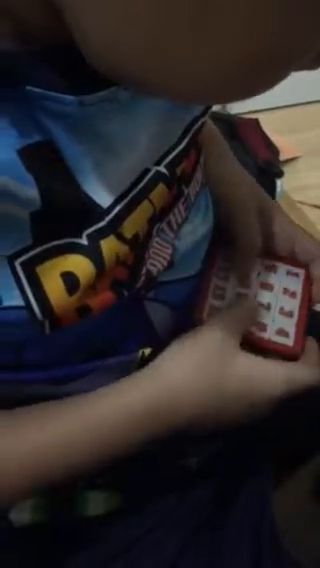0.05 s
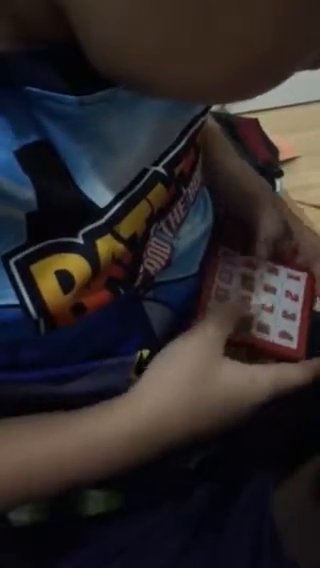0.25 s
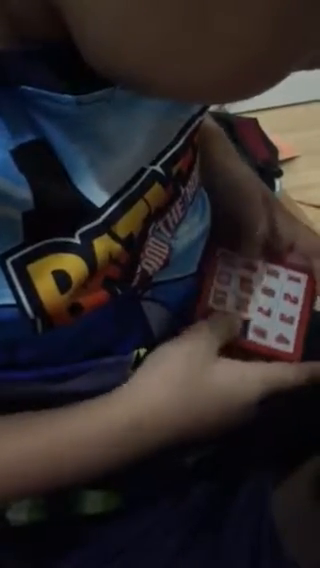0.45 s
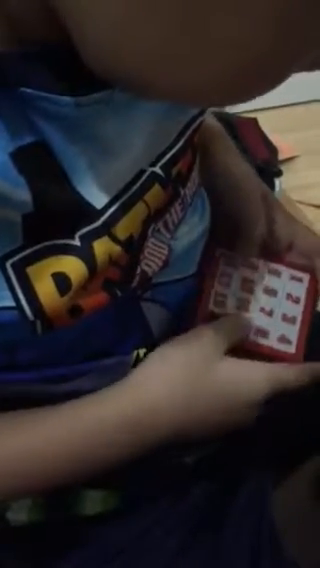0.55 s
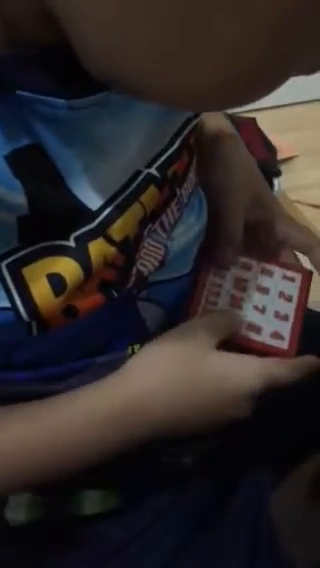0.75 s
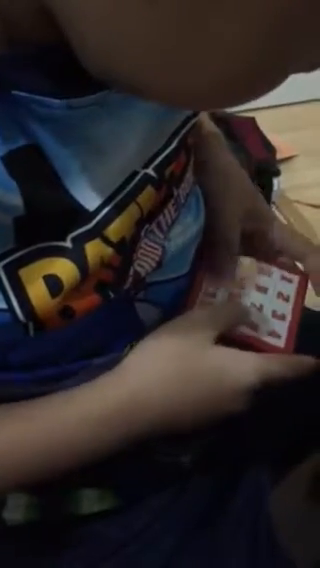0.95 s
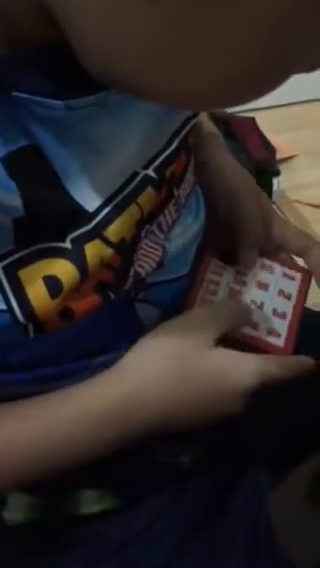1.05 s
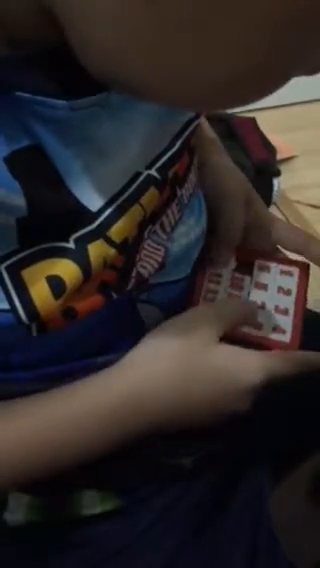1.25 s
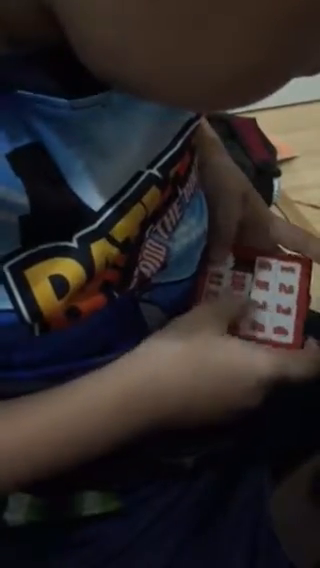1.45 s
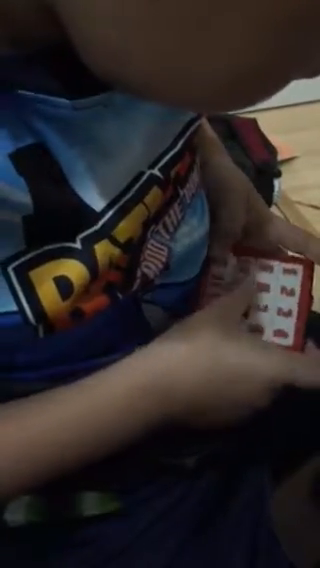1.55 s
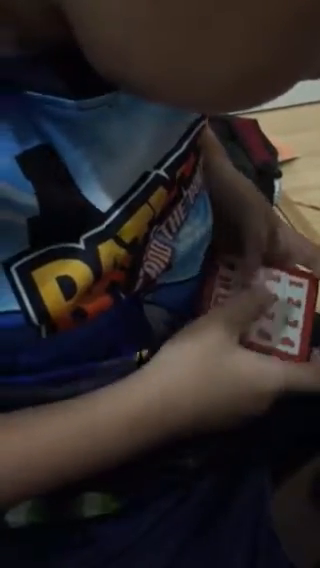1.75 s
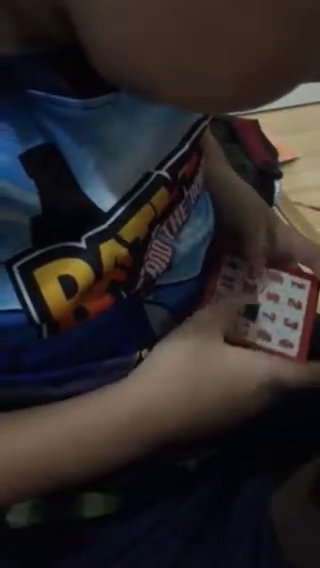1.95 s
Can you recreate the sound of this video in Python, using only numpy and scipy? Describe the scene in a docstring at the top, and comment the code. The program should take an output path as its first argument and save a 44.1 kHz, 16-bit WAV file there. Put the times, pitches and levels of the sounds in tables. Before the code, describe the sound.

Plastic tiles in a small sliding puzzle scrape briefly and clatter into each other. Several uneven moves follow, with light ticks and a soft finger bump on the case, close to the microphone in a quiet, faintly humming room.

```python
"""Fingers push the tiles of a small plastic sliding puzzle, close by in a quiet, humming room.
A tile first scrapes along its groove by stick-slip friction and clatters into its neighbours at 0.2 s;
each impact cracks and excites the damped modes of tile, frame and hollow back. A second move ends at
0.65 s, a finger thuds on the case at 0.8 s, and a third move follows at once. After a few light ticks,
more moves run from 1.3 to 1.85 s, with a firm knock at 1.7 s. Each sound leaves a short room tail."""
import sys
import numpy as np
from scipy import signal
from scipy.fft import rfft, irfft, next_fast_len
from scipy.io import wavfile

SR = 44100
rng = np.random.default_rng(int(sys.argv[2]) if len(sys.argv) > 2 else 0)


def bounce(signal):
    """Save signal as a 16-bit WAV file at the path given by the first command-line argument."""
    frames = np.transpose(np.atleast_2d(signal))
    limited = np.clip(frames, -1, 1)
    pcm = np.round(limited * 32767).astype(np.int16)
    wavfile.write(sys.argv[1], SR, pcm)


N = 88200
TIME = np.arange(N) / SR
RING_TIME = TIME[:SR // 10]

# Tile impacts, levels as spread over 1 ms and before the low cut:
# t/s, frame level/dB, hollow level/dB, tile level/dB, tile f/Hz, crack level/dB
IMPACTS = [(.0515, -54, -56, -46, 3320, -56.5), (0.0745, -58, -51.5, -53, 5600, -72),
           (0.1116, -48, -62, -41.5, 5300, -64), (0.117, -54, -52, -46, 4160, -70),
           (0.121, -48, -57, -50, 4500, -66), (0.1326, -47, -60, -37.5, 3470, -50),
           (0.1612, -34, -36, -37, 3870, -35.5), (0.1661, -44, -40, -40, 4000, -55),
           (0.1697, -39, -53, -38, 5200, -53), (0.1807, -33.5, -45, -25, 5524, -29),
           (0.1816, -29, -45, -22, 5880, -28.5), (0.1891, -27.5, -36.5, -29, 3160, -33),
           (.193, -29.5, -53, -21.5, 3320, -30), (0.204, -34, -51, -33.5, 3670, -46),
           (.279, -40, -41.5, -45, 5500, -55), (0.2834, -46, -55, -37.5, 5650, -40.5),
           (0.2845, -40.5, -51, -41.5, 2890, -63), (0.552, -47, -38.5, -35, 3110, -35.5),
           (0.5543, -41.5, -44, -45, 5320, -40.5), (0.5815, -60, -63, -43, 2930, -48),
           (0.6405, -41, -36, -33, 3380, -40), (0.6496, -30.5, -31, -21, 5810, -29),
           (0.7775, -64, -62, -55.5, 3380, -72), (0.8797, -47, -68, -41, 4510, -38),
           (.886, -40.5, -47, -36.5, 4000, -36), (0.8926, -43, -54, -46, 3670, -45),
           (0.9183, -35, -38, -42, 3900, -48), (.9222, -41, -52, -34, 3250, -42.5),
           (0.95, -30.5, -33.5, -28.5, 3780, -30), (0.954, -39, -47, -35.5, 4520, -40),
           (1.1046, -55, -57, -45, 3620, -57.5), (1.12, -52, -63, -59, 3370, -68),
           (1.2804, -60, -76, -57.5, 3180, -72), (1.3131, -47.5, -56, -42.5, 3520, -50.5),
           (1.339, -52, -57, -32.5, 4310, -41), (1.433, -37, -40.5, -28.5, 3715, -33),
           (1.5512, -42.5, -59, -36.5, 3660, -54.5), (1.5886, -47.5, -65, -52, 3280, -68),
           (1.6081, -62, -69, -46, 2780, -72), (1.6261, -47.5, -66, -46.5, 4830, -62),
           (1.638, -72, -72, -53, 4670, -59), (1.6662, -35, -45.5, -30, 4220, -40),
           (1.6772, -49, -56, -44, 3630, -53), (1.694, -54, -51, -38, 4020, -53),
           (1.7042, -37, -38, -30, 5900, -36.5), (1.716, -33.5, -39.5, -19, 5590, -31.5),
           (1.725, -45, -48, -38, 2640, -56), (1.8315, -46.5, -49, -52, 3650, -61),
           (1.8463, -35.5, -39, -41.5, 6100, -41)]
# Adjacent tiles set ringing: t/s, level/dB, f/Hz, room send/dB
NEIGHBOUR_RINGS = [(.1815, -24.5, 6900, 0), (0.5529, -39, 5330, 5), (.65, -36, 8480, -1),
                   (.9505, -34, 7900, -5), (1.105, -60.5, 2430, -1), (1.3389, -39, 4270, -10),
                   (1.4328, -35, 6150, -1.5), (1.6666, -38, 2350, 6), (1.7163, -30.5, 6540, 2.5),
                   (1.847, -45.5, 9900, -7)]
# Modes of a tile: ratio to its pitch, relative level/dB, T60/s at the reference pitch
TILE_MODES = [(.74, 0.5, 0.0019), (1, 0, 0.0047), (1.17, -3, 0.0035), (1.5, -5.5, 0.0013)]
# Modes of the frame: f/Hz, relative level/dB, T60/s
FRAME_MODES = [(1481, -2.5, 0.012), (1674, -1.5, 0.016), (1812, -.5, 0.012), (2020, -2.5, 0.0058),
               (2390, -0.5, 0.013), (2578, -3.5, 0.014), (2830, -3.5, 0.011), (3087, -1.5, .016),
               (3417, -0.5, 0.0078), (3695, -4.5, 0.023), (4445, 0, 0.0072)]
# Modes of the hollow back of the case: f/Hz, relative level/dB, T60/s
HOLLOW_MODES = [(1033, -10, 0.062), (1190, 6.5, 0.019), (1254, -13, 0.015)]
# Spectrum of the impact crack: f/Hz, relative level/dB
CRACK_SPECTRUM = [(1000, -53), (4000, -8), (7000, -2), (9000, -3.5), (11000, -7), (13000, -8.5),
                  (16000, -21)]
# Tile strokes: start t/s, end t/s, start level/dB, end level/dB, relative hiss level/dB
STROKES = [(0.039, 0.095, -62.5, -63.5, -7.5), (0.097, 0.151, -67, -53, -3.5),
           (.153, 0.173, -47.5, -46, -14), (0.185, 0.213, -44, -48, -11), (0.543, 0.576, -54.5, -65, -9),
           (0.586, 0.666, -56.5, -48, -4.5), (0.89, 0.915, -44.5, -42.5, -9),
           (0.918, 0.948, -40.5, -46, -9), (1.299, 1.338, -66, -50.5, -2), (1.35, 1.449, -60.5, -61, -1),
           (1.595, 1.606, -62, -58, -15), (1.614, 1.673, -62, -64.5, -3.5),
           (1.676, 1.724, -55.5, -45.5, -6.5), (1.822, 1.864, -62, -63.5, -8)]
# Response of a tile's face to friction: f/Hz, relative level/dB
FACE_RESPONSE = [(500, -18.5), (850, -11), (1100, -10.5), (2000, -1.5), (3000, 0.5), (4300, 3.5),
                 (5200, -16), (7000, -14), (9000, -14.5), (16000, -48)]
# Spectrum of the groove's hiss: f/Hz, relative level/dB
HISS_SPECTRUM = [(2000, -7.5), (6000, 0), (9000, -2), (11500, -13), (13000, -5), (16000, -16)]
# Finger bumps on the case: t/s, level/dB, f/Hz, T60/s
FINGER_BUMPS = [(.19, -51, 480, 0.054), (.2485, -46, 436, 0.031), (.5525, -54.5, 646, 0.019),
                (.65, -52.5, 567, 0.066), (.8012, -52.5, 1050, 0.0064), (.813, -50, 190, 0.043),
                (.8129, -43, 884, 0.006), (.8152, -46.5, 1230, 0.0084), (1.7165, -53.5, 615, 0.021),
                (1.9492, -58, 1710, 0.025)]
# Spectrum of the reflections: f/Hz, relative level/dB
ECHO_SPECTRUM = [(300, 4), (1200, -0.5), (2500, 5.5), (4000, 0.5), (5500, -2), (7000, .5), (10000, -1.5),
                 (16000, -2)]
# Spectrum of the room's rumble: f/Hz, relative level/dB
RUMBLE_SPECTRUM = [(20, -11.5), (33, -18.5), (45, 1), (60, 2.5), (85, 0), (150, -2.5), (230, -2.5),
                   (320, -7.5), (420, -13), (750, -20.5), (2000, -23), (5000, -28), (10000, -31),
                   (16000, -35.5)]
# Lasting hum tones: f/Hz, level/dB
HUM_TONES = [(152, -80), (215, -77.5), (282, -74.5), (323, -76), (964, -82.5)]
# Gaussian swells of hum: centre t/s, half width/s, level/dB, f/Hz
HUM_SWELLS = [(0.017, 0.048, -58, 211.8), (0.33, 0.1, -66.5, 203), (0.69, 0.15, -69, 218.4),
              (.88, 0.072, -67, 156.6), (0.99, 0.035, -63.5, 241.7), (1.092, 0.046, -62, 152.5)]
# Microphone response: f/Hz, level/dB
MICROPHONE_RESPONSE = [(5000, 0.5), (6800, 0), (7400, -5), (8300, -0.5), (9200, -1), (13000, -2),
                       (15500, 0)]

CONTACT_RISE_S, CRACK_T60_S, NEIGHBOUR_T60_S = 0.00033, 0.0095, 0.0044
TILE_REFERENCE_HZ, TILE_DAMPING = 3800, 0.76  # ring time falls by this power of the pitch
TILE_ROOM_DB = -1.5  # a tile's face beams at the listener, so less reaches the room
FRAME_SCATTER_DB = 1.7


def knocks():
    """Impact excitation: a crack and the free vibration of tiles and case; returns (direct, spill)."""
    direct, spill = np.zeros((2, N))  # spill is the sound sent into the room
    onset = 1 - np.exp(-(RING_TIME / CONTACT_RISE_S) ** 2)
    for s, frame_db, hollow_db, tile_db, tile_hz, crack_db in IMPACTS:
        burst = rng.standard_normal(len(RING_TIME)) * decay(RING_TIME, CRACK_T60_S)
        crack = colour(burst, CRACK_SPECTRUM)
        frame = ring(FRAME_MODES, scatter_db=FRAME_SCATTER_DB)
        t60_scale = (TILE_REFERENCE_HZ / tile_hz) ** TILE_DAMPING
        tile_modes = [(ratio, db, t60 * t60_scale) for ratio, db, t60 in TILE_MODES]
        tile = ring(tile_modes, tile_hz, scatter_db=0.65, alternate=True)
        hollow = ring(HOLLOW_MODES)
        for db, part, room_db in [(frame_db, frame, 0), (hollow_db, hollow, 0),
                                  (tile_db, tile, TILE_ROOM_DB), (crack_db, crack, 0)]:
            blow = from_db(db) * unit_energy(rebound(onset * part, tile_hz))
            add_blow(direct, s, blow)
            add_blow(spill, s, from_db(room_db) * blow)
    for s, db, hz, room_db in NEIGHBOUR_RINGS:
        blow = from_db(db) * unit_energy(onset * damped_sine(hz, NEIGHBOUR_T60_S))
        add_blow(direct, s, blow)
        add_blow(spill, s, from_db(room_db) * blow)
    return np.array([direct, spill])


def ring(modes, pitch=1, scatter_db=0, alternate=False):
    """Modal superposition: a struck body sums damped modes, in phase or with alternating signs."""
    total = 0
    for k, (f, db, t60) in enumerate(modes):
        sign = (-1) ** k if alternate else 1
        gain = from_db(db + scatter_db * rng.normal())
        total += sign * gain * unit_energy(damped_sine(f * pitch, t60))
    return unit_energy(total)


def rebound(blow, hz, near_s=0.0006, level_db=-13):
    """Constructive interference: a weaker second touch follows after a whole number of tile cycles."""
    gap = np.round(near_s * hz) / hz
    return blow + from_db(level_db) * np.interp(RING_TIME - gap, RING_TIME, blow, left=0)


def slides(edge_s=0.0073, frame_db=-0.5, face_db=-5.5):
    """Forced vibration: friction shakes the moving tile's face and the frame while the groove hisses."""
    jolts = slips()
    face = from_db(face_db) * unit_rms(colour(jolts, FACE_RESPONSE))
    hiss = unit_rms(colour(rng.standard_normal(N), HISS_SPECTRUM))
    out = np.zeros(N)
    for start, end, start_db, end_db, hiss_db in STROKES:
        gate = np.clip(np.minimum(TIME - start, end - TIME) / edge_s + 0.5, 0, 1)
        push = gate * from_db(np.interp(TIME, [start, end], [start_db, end_db]))
        frame = signal.fftconvolve(jolts * push, ring(FRAME_MODES, scatter_db=FRAME_SCATTER_DB))[:N]
        out += from_db(frame_db) * frame + push * (face + from_db(hiss_db) * hiss)
    return out


def slips(per_second=3000, scatter_db=3.5):
    """Stick-slip friction: a dense random train of tiny impulses of uneven size."""
    sizes = from_db(scatter_db * np.minimum(rng.exponential(1, N), 4))
    signs = rng.choice([-1, 1], N)
    slipping = rng.random(N) < per_second / SR
    return unit_rms(sizes * signs * slipping)


def bumps(attack_s=0.0009):
    """Soft impact: each bump of a finger excites one heavily damped mode of the case."""
    out = np.zeros(N)
    onset = 1 - np.exp(-RING_TIME / attack_s)
    for s, db, hz, t60 in FINGER_BUMPS:
        add_blow(out, s, from_db(db) * unit_energy(onset * damped_sine(hz, t60)))
    return out


def room(direct, spill):
    """Reflection: hands and chest return the direct sound early; the spill reverberates in the room."""
    near = reflections(level_db=-11.5, delay_s=0.0012, t60_s=0.026)
    far = reflections(level_db=-14.5, delay_s=0.0052, t60_s=0.25)
    return direct + signal.fftconvolve(direct, near)[:N] + signal.fftconvolve(spill, far)[:N]


def reflections(level_db, delay_s, t60_s):
    """Diffuse impulse response: dense echoes build up after a delay and decay exponentially."""
    build_up = np.clip(TIME / delay_s - 1, 0, 1)
    echoes = rng.standard_normal(N) * decay(TIME, t60_s) * build_up
    return from_db(level_db) * unit_energy(colour(echoes, ECHO_SPECTRUM))


def background(rumble_db=-64.6):
    """Ambient noise: a continuous low spectrum with hum tones that waver and swell."""
    rumble = from_db(rumble_db) * unit_rms(colour(rng.standard_normal(2 * N), RUMBLE_SPECTRUM)[N:])
    hum = sum(from_db(db) * hum_tone(hz, waver_hz=2.55) for hz, db in HUM_TONES)
    swells = sum(from_db(db) * np.exp(-((TIME - s) / half_width) ** 2) * hum_tone(hz, waver_hz=11.5)
                 for s, half_width, db, hz in HUM_SWELLS)
    return rumble + hum + swells


def hum_tone(hz, waver_hz, depth=0.66):
    """Narrow-band modulation: slow noise varies a tone's amplitude and phase."""
    lowpass = signal.butter(2, waver_hz, fs=SR, output="sos")
    in_phase, quadrature = unit_rms(signal.sosfilt(lowpass, rng.standard_normal((2, 2 * N)))[:, N:])
    envelope = 1 + depth * (in_phase + 1j * quadrature)
    return unit_rms(np.real(envelope * np.exp(2j * np.pi * hz * TIME)))


def from_db(db):
    """Amplitude ratio of a level in decibels."""
    return 10 ** (np.asarray(db) / 20)


def unit_rms(x):
    """Normalisation to a mean square of 1."""
    return x / np.sqrt(np.mean(x ** 2) + 1e-20)


def unit_energy(x):
    """Normalisation to a sum of squares of 1."""
    return x / np.sqrt(np.sum(x ** 2) + 1e-20)


def decay(t, t60):
    """Exponential damping: 60 dB down after t60."""
    return np.exp(-np.log(1000) * t / t60)


def damped_sine(hz, t60):
    """Free vibration of a damped oscillator."""
    return np.sin(2 * np.pi * hz * RING_TIME) * decay(RING_TIME, t60)


def colour(x, points):
    """Minimum-phase filtering through (f/Hz, level/dB) points."""
    hz, db = np.transpose(points)
    size = 2 * next_fast_len(len(x))
    f = np.maximum(np.arange(size // 2 + 1) * SR / size, 1)
    gain = from_db(np.interp(np.log(f), np.log(hz), db))
    cepstrum = irfft(np.log(gain))
    cepstrum[1:size // 2] *= 2  # folding onto positive time makes the filter causal
    cepstrum[size // 2 + 1:] = 0
    return irfft(rfft(x, size) * np.exp(rfft(cepstrum)))[:len(x)]


def add_blow(out, s, blow):
    """Superposition of a blow at time s; unit energy counts as rms 1 for 1 ms."""
    start = int(s * SR)
    out[start:start + len(blow)] += blow[:N - start] * np.sqrt(SR / 1000)


def scene(low_cut_hz=1112, bump_room_db=3):
    """Radiation: the small puzzle emits little bass; its whole case sends bumps in all directions."""
    low_cut = signal.butter(4, low_cut_hz, "high", fs=SR, output="sos")
    direct, spill = signal.sosfilt(low_cut, knocks() + slides())
    thuds = bumps()
    puzzle = room(direct + thuds, spill + from_db(bump_room_db) * thuds)
    return (puzzle + background())[None]


def record(dry, cutoff_hz=16000):
    """Frequency response: the microphone colours the treble, and a steep low-pass limits the band."""
    lowpass = signal.ellip(10, 0.2, 80, cutoff_hz, fs=SR, output="sos")
    return signal.sosfilt(lowpass, colour(dry[0], MICROPHONE_RESPONSE))[None]


dry = scene()
out = record(dry)
bounce(out)
```